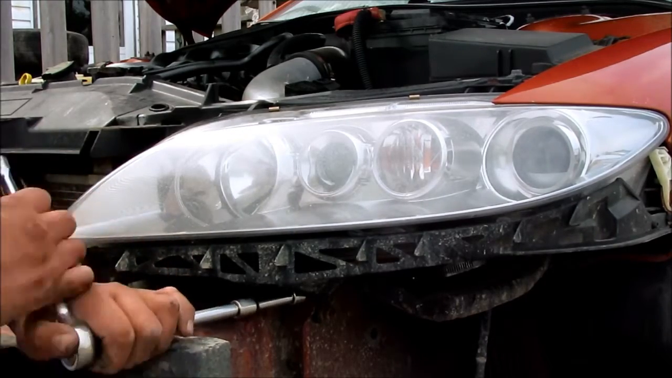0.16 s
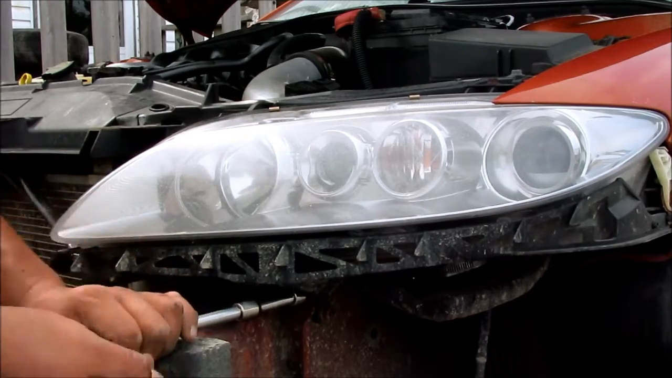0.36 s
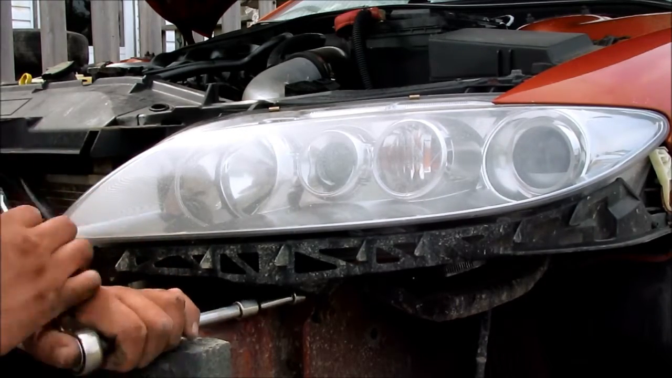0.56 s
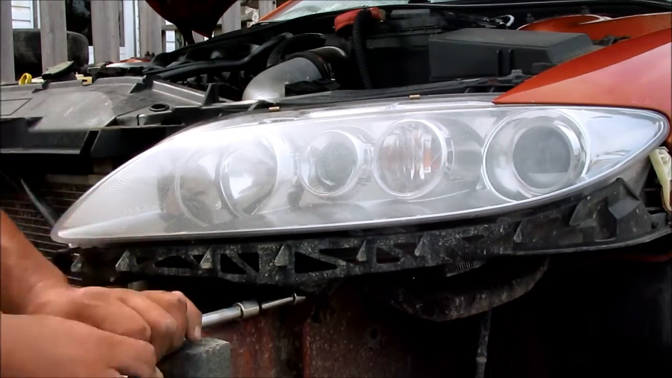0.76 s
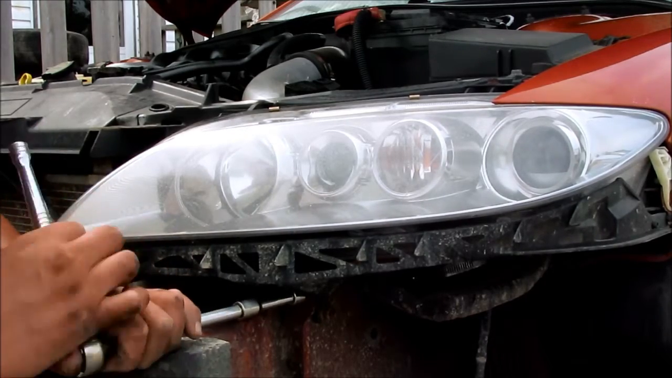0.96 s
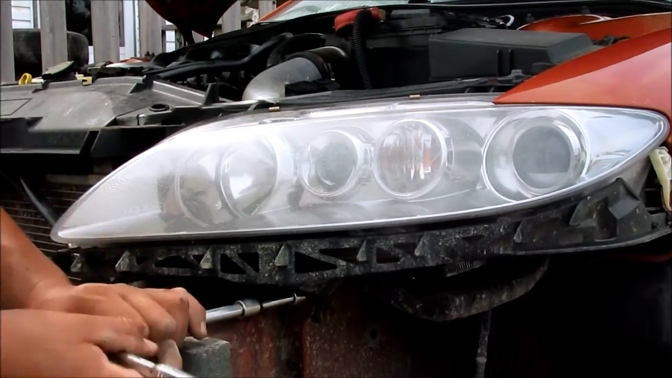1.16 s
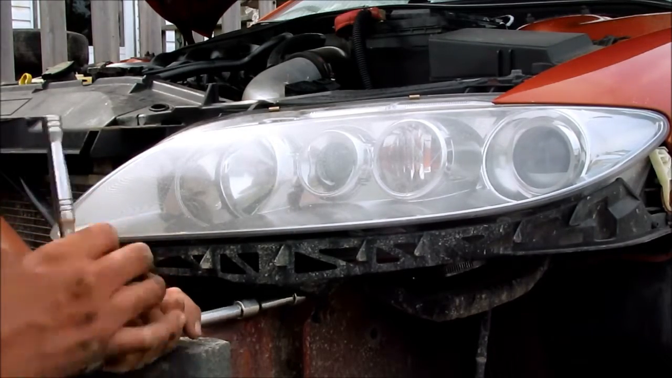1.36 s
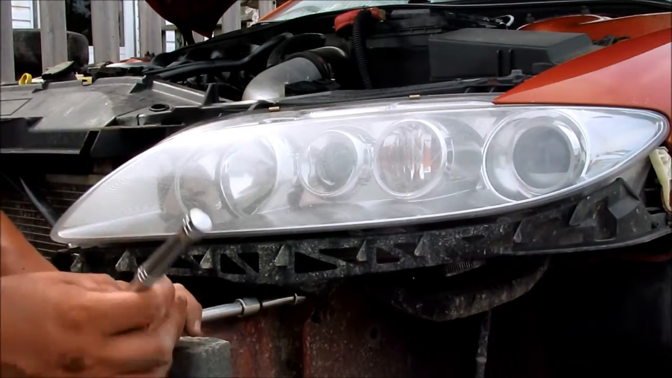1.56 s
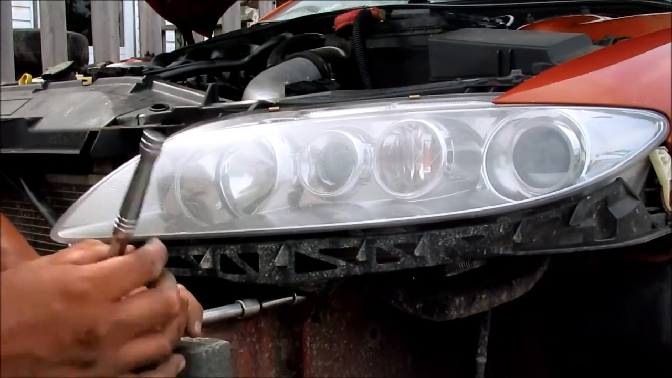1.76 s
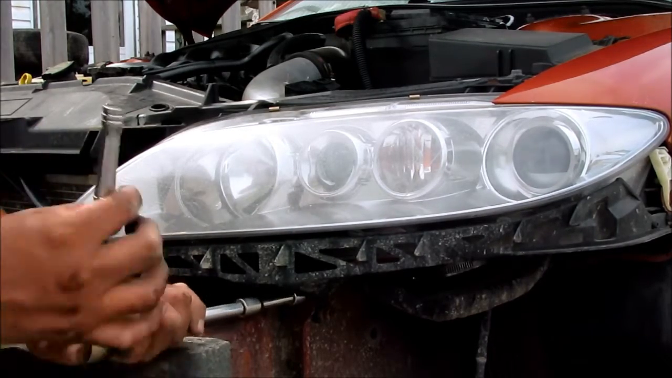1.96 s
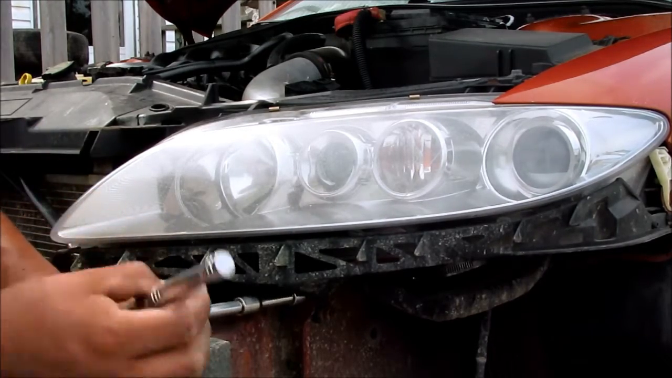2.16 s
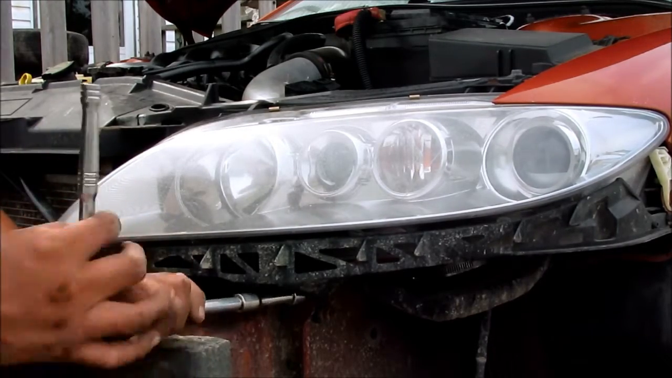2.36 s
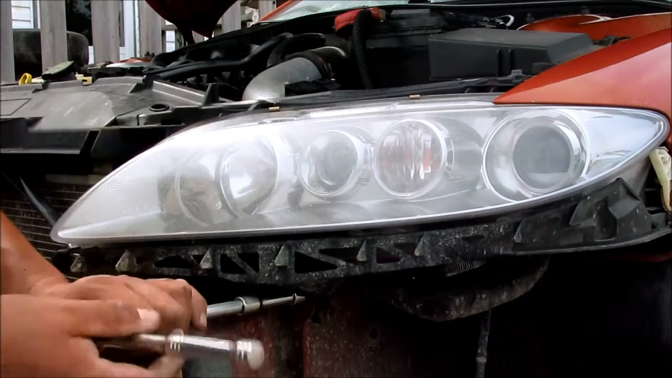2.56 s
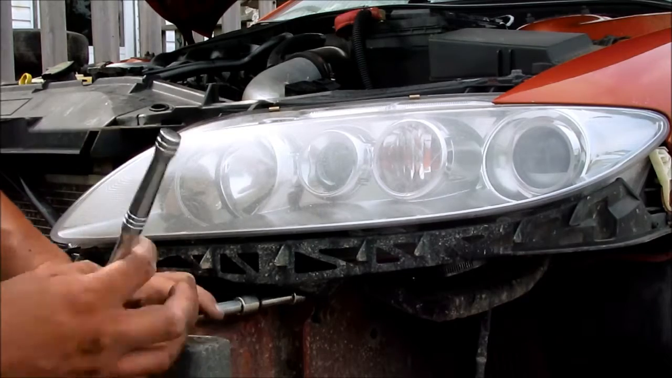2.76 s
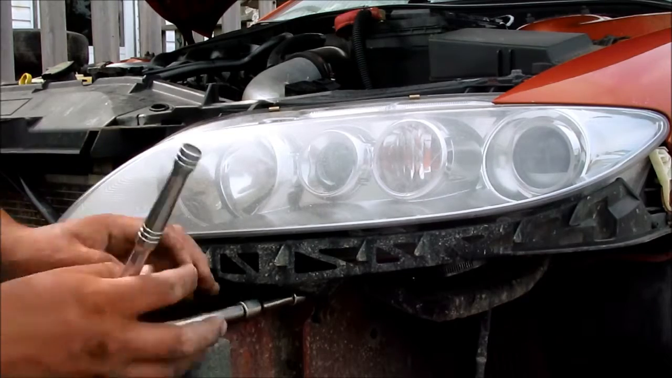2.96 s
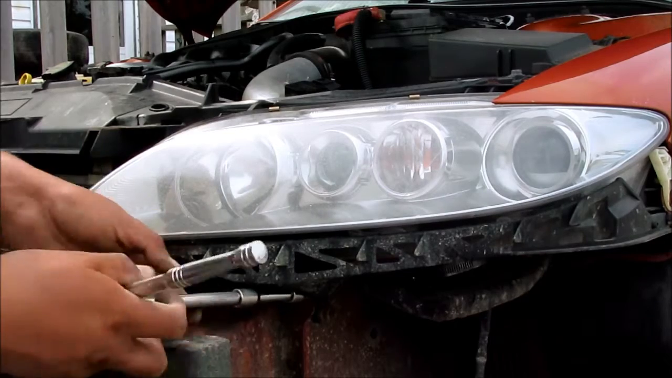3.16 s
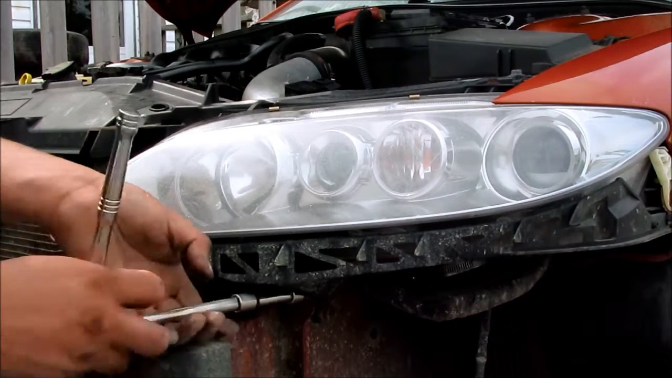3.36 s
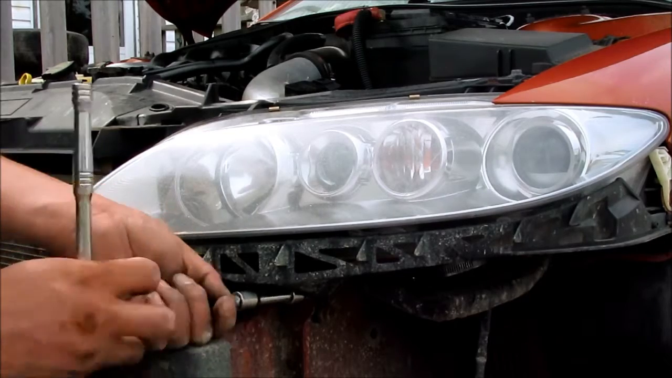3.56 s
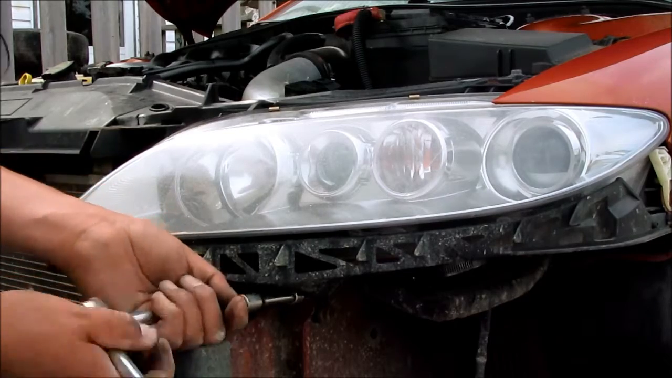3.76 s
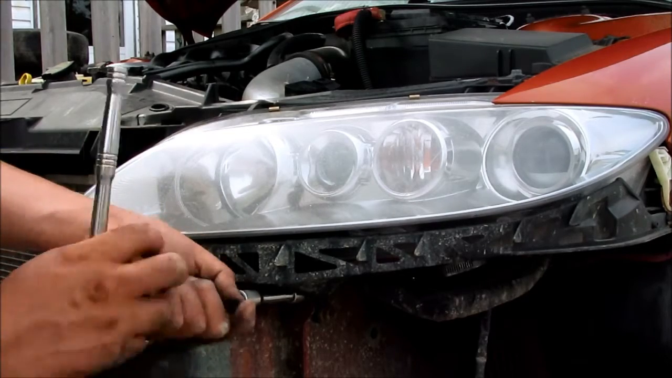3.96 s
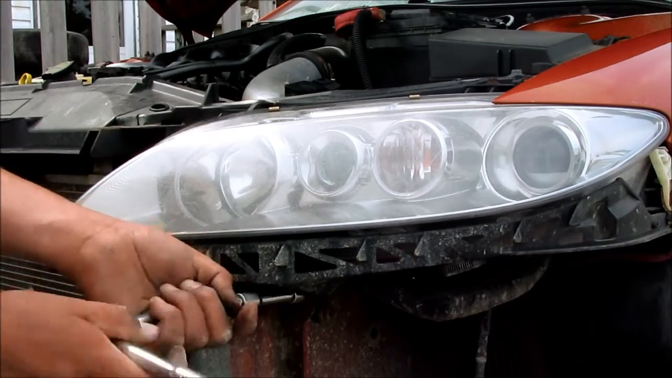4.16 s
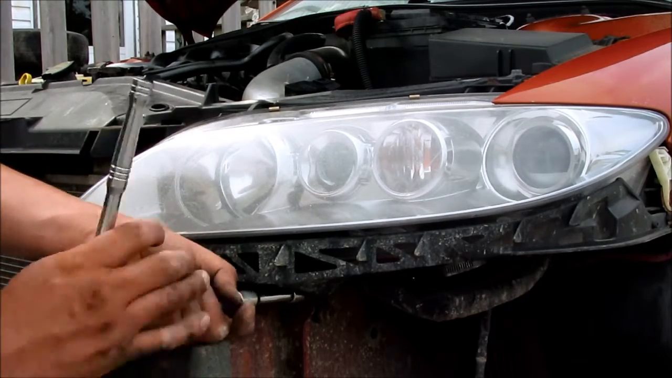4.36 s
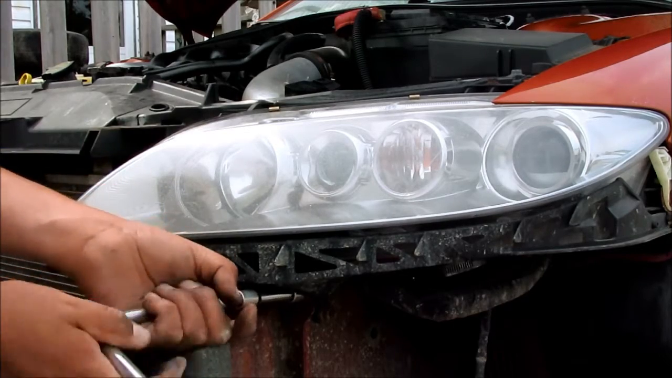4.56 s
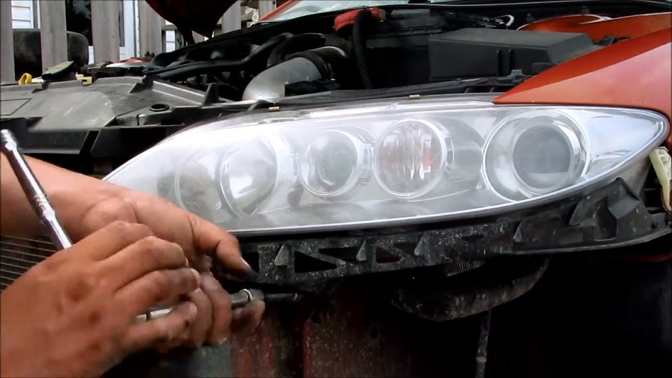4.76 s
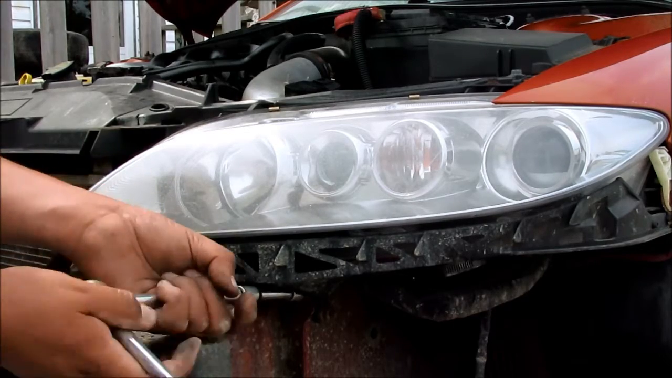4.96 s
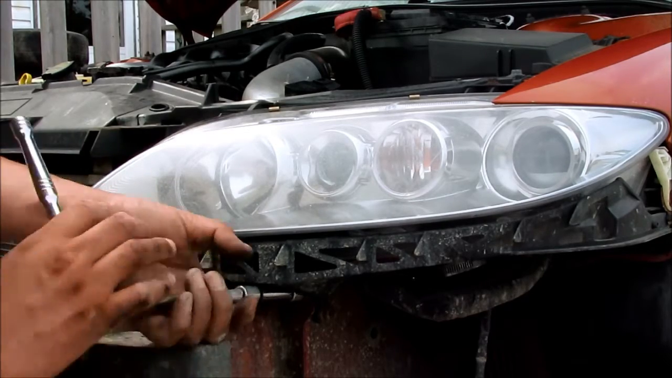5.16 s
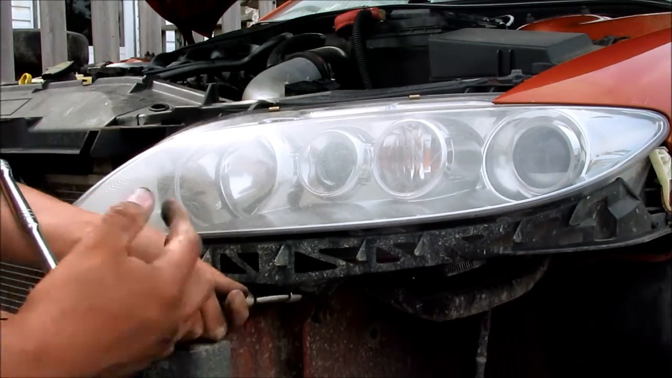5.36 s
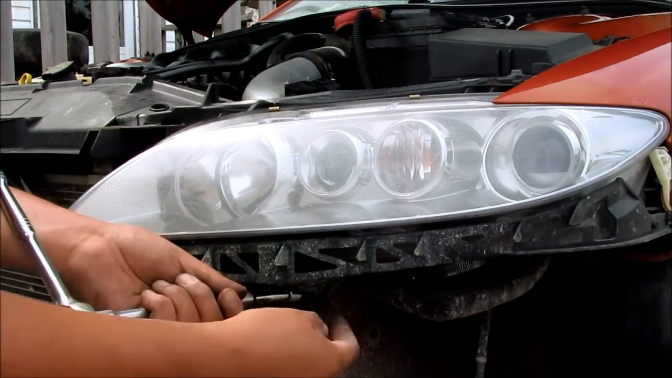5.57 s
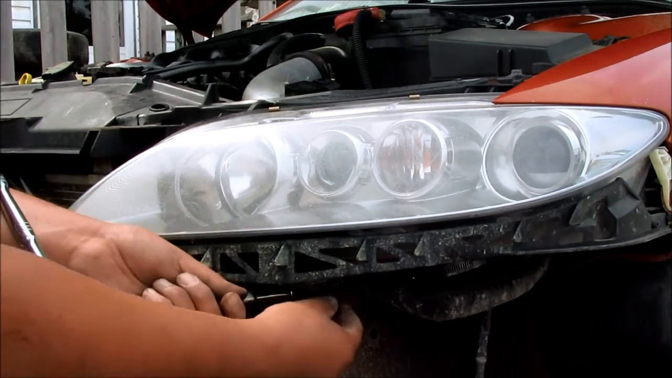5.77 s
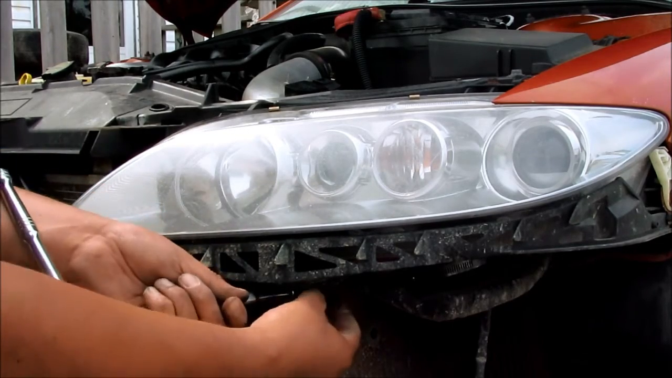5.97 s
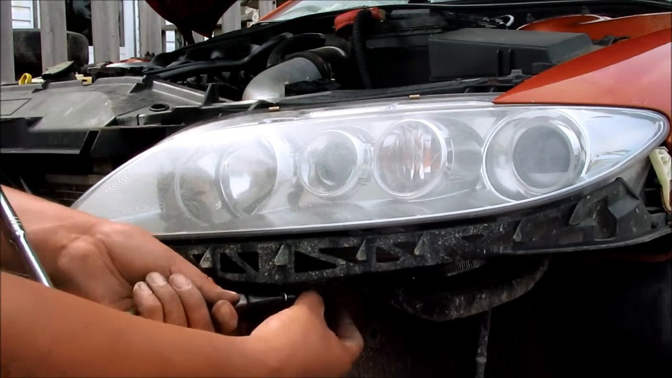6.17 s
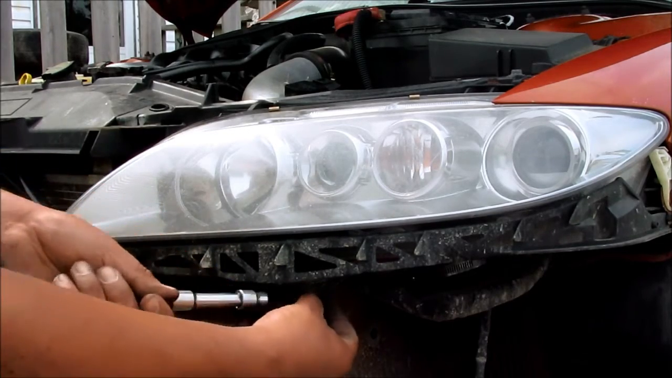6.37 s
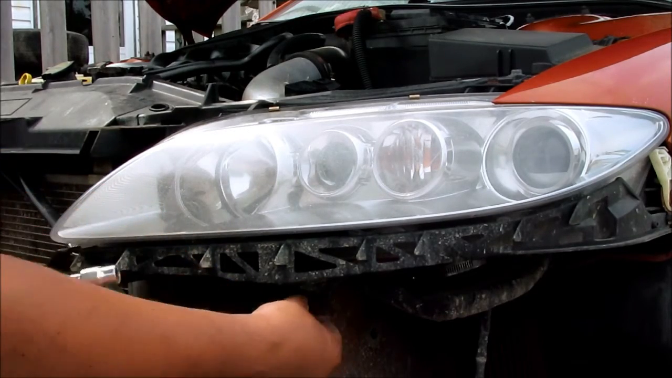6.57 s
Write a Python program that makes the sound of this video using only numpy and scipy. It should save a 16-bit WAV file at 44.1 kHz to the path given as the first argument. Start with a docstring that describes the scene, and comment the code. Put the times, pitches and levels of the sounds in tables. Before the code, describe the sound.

A ratchet wrench clicks in quick repeated bursts on a car bolt outdoors, thinning to metal knocks and rubbing, with light wind on the microphone.

```python
"""Outdoors at a car, a ratchet wrench is swung back and forth on a bolt.
On each return stroke the pawl (a small catch) snaps over the gear teeth, and the steel head and
handle ring. The socket and extension bar knock and rub in the hands, and one blow hits the bodywork.
Gusts of wind buffet the two microphone ports, mostly the right, over a faint outdoor background."""
import sys
import numpy as np
from scipy import signal
from scipy.fft import rfft, irfft, next_fast_len
from scipy.io import wavfile

SR = 44100
rng = np.random.default_rng(int(sys.argv[2]) if len(sys.argv) > 2 else 0)


def store_pcm(level_fs):
    """Save levels as 16-bit WAV."""
    pcm = np.round(np.clip(level_fs, -1, 1) * 32767).astype(np.int16)
    wavfile.write(sys.argv[1], SR, np.atleast_2d(pcm).T)


N = 291060

# Return strokes of the hand. Each row: first and last tooth in seconds, number of teeth, fastest
# point (0 to 1), extra gap between teeth at the start and at the end (in shortest gaps).
STROKES = [(0.0009, 0.0237, 4, .15, 0, .27), (0.2637, 0.3887, 14, .61, .76, .63),
           (0.6391, 0.7722, 16, .67, .49, 1.1), (1.0207, 1.1349, 15, .63, .49, 1.71),
           (1.397, 1.5163, 14, .29, .43, .67), (1.7592, 1.8734, 15, .64, .72, 1.99),
           (2.1316, 2.2517, 14, .59, .6, 1.54), (2.52, 2.6423, 16, .75, .75, 1.14),
           (3.5724, 3.7258, 21, .67, 1.04, .88), (4.0014, 4.1158, 14, .42, .56, 0),
           (4.4071, 4.5294, 15, .8, .81, .71), (4.8001, 4.9719, 23, .36, .37, .27)]
# The extension bar's modes, the tones it rings at.
# Each row: pitch in Hz, relative level in dB, ring time (seconds to fade by 60 dB).
BAR_MODES = [(689.4, -20.5, 0.1), (1167, -16.5, 0.14), (1550, -12, 0.0055), (1974, -15.5, 0.012),
             (2615, -17.5, 0.019), (2920, -18, 0.02285)]


def amp(db):
    """Turn decibels into a gain."""
    return 10 ** (np.asarray(db) / 20)


def rms_one(x):
    """Scale a signal to an average strength (rms) of 1."""
    return x / np.sqrt(np.mean(x ** 2) + 1e-20)


def in_time(rows):
    """Join timed rows with straight lines, giving each column one value per sample."""
    times, *columns = np.transpose(rows)
    return [np.interp(np.arange(N) / SR, times, column) for column in columns]


def colour(x, spectrum):
    """Shape the tone of x with a curve of (Hz, dB) points."""
    hz, db = np.transpose(spectrum)
    size = next_fast_len(N)
    log_hz = np.log(np.arange(size // 2 + 1) * SR / size + 1)
    gain = amp(np.interp(log_hz, np.log(hz), db, left=-90))
    return irfft(rfft(x, size) * rms_one(gain), size)[..., :N]


def band(x, low_hz, high_hz):
    """Keep the sound between two frequencies."""
    return signal.sosfilt(signal.butter(2, [low_hz, high_hz], "band", fs=SR, output="sos"), x)


def drift(hz):
    """A smooth random wobble of typical size 1."""
    r = np.exp(-2 * np.pi * hz / SR)
    return rms_one(signal.lfilter([1], [1, -2 * r, r * r], rng.standard_normal(N + SR))[SR:])


def ring(push, hz, ring_s):
    """One mode: every push starts a fading tone."""
    r, w = amp(-60 / (ring_s * SR)), 2 * np.pi * hz / SR
    return signal.lfilter([0, np.sin(w)], [1, -2 * r * np.cos(w), r * r], push + 1e-18)


def train(times, db):
    """A click of the given level at each time."""
    clicks = np.zeros(N)
    np.add.at(clicks, (np.asarray(times) * SR).astype(int), amp(db))
    return clicks


def envelope(clicks, rise_s, fall_s):
    """A loudness curve that swells and dies after each click."""
    a, b = np.exp(-1 / (rise_s * SR)), np.exp(-1 / (fall_s * SR))
    return signal.lfilter([1 - a], np.convolve([1, -a], [1, -b]), clicks + 1e-18)


def widen(pair, side_db):
    """Make stereo from two signals: one both ears share, one that sets them apart."""
    mid, side = pair
    return mid + amp(side_db) * side * [[1], [-1]]


def stereo_noise(spectrum, side_db):
    """Shaped noise, partly unlike in the two channels."""
    return widen(colour(rng.standard_normal((2, N)), spectrum), side_db)


def struck(times, db, modes, scatter_db, detune, rise_s, spread=1, jump=1, bend=0):
    """Each blow stops the old ring and restarts every mode at a slightly different pitch and level."""
    memory = .75  # share of the pitch offset kept from blow to blow
    luck = rng.standard_normal((len(times), len(modes), 4))
    wander = signal.lfilter([np.sqrt(1 - memory ** 2)], [1, -memory], luck[:, :, 1], axis=0)
    offset = detune * wander + np.reshape(bend, (-1, 1))
    last = np.clip(np.searchsorted(times * SR, np.arange(N)) - 1, 0, None)  # latest blow at each sample
    age = np.clip(np.arange(N) / SR - times[last], 0, None)
    out = 0
    for k, (hz, mode_db, ring_s) in enumerate(modes):
        blow_db = db + mode_db + scatter_db * luck[:, k, 0]
        gain = amp(blow_db[last] - 60 * age / ring_s) * (1 - np.exp(-age / rise_s))
        cycles = np.cumsum(hz * (1 + offset[last, k])) / SR + jump * luck[last, k, 2]
        # Modes radiate unevenly, so left and right are about `spread` radians out of step.
        skew = spread * luck[last, k, 3] * [[.5], [-.5]]
        out = out + gain * np.sin(2 * np.pi * cycles + skew)
    return out


def outdoor_air():
    """The faint, steady rush of the open air."""
    # Its tone. Each row: frequency in Hz, relative level in dB.
    spectrum = [(59, -29), (100, 6), (481, -1), (950, -19), (1150, -4.5), (4200, -10), (10900, -35),
                (13800, -11.5), (16000, -56)]
    return amp(-59) * stereo_noise(spectrum, side_db=0)


def wind():
    """Gusts rumble in each microphone port, brighter when stronger; small swirls slap the right one."""
    # Wind strength. Each row: time in seconds, relative level in dB, left minus right in dB.
    gusts = [(0.0, -43, -4.5), (0.86, -39.5, -1.5), (1.61, -46, -4), (1.8, -43, -3), (1.95, -38,-6),
             (2.15, -35.5, 1), (2.26, -31, -12), (2.59, -43, 7.5), (2.9, -41.5, -9), (3.33, -48.5, 2),
             (3.48, -43, -13.5), (3.66, -49.5, -6), (4.35, -40.5, -3.5), (4.39, -42, 0), (4.96, -45.5, -5),
             (5.43, -36.5, -22.5), (5.73, -45.5, -1.5), (6.42, -31.5, -22), (6.44, -41, -9),
             (6.59, -46, -8)]
    # Single swirls of air. Each row: time in seconds, relative level in dB.
    slaps = [(0.899, -32), (2.805, -29), (2.875, -36), (2.904, -33), (3.42, -28.5), (3.444, -38),
             (3.521, -29), (4.32, -29), (5.266, -22.5), (5.301, -21), (5.325, -24), (5.4, -23),
             (5.429, -27.5), (5.533, -27), (5.641, -28), (5.802, -30.5), (5.923, -22), (6.117, -24),
             (6.205, -30), (6.255, -28), (6.282, -33), (6.339, -19.5), (6.371, -24), (6.401, -20.5),
             (6.417, -22)]
    out = np.zeros((2, N))
    both_db, lean_db = in_time(gusts)
    for port, level_db in enumerate([both_db + lean_db / 2, both_db - lean_db / 2]):
        gust = amp(level_db - 1.5 + 3.2 * drift(16.7) + 2.2 * drift(4))
        low, high = rng.standard_normal((2, N))
        out[port] = gust * rms_one(band(low, 28.8, 126.6))
        out[port] += gust ** 1.39 * amp(5) * rms_one(band(high, 100, 272))
    times, slap_db = np.transpose(slaps)
    pushes = envelope(train(times, slap_db + 18.5), rise_s=0.0011, fall_s=0.0024)
    return out - band(pushes, 69.7, 460) * amp([[-18], [0]])


def socket():
    """The loose socket and bar rub and knock in the hands, and the gritty noise rings the bar."""
    # Loose parts knocking. Each row: time in seconds, dull level in dB, bright part in dB above that.
    knocks = [(0.053, -32.5, -2), (0.156, -45, 9), (0.166, -52, 8), (0.188, -61, 11), (0.415, -36.5, 7.5),
              (0.525, -63, 22), (0.555, -56.5, 17.5), (0.613, -27, -6), (0.627, -34, 9), (0.997, -35.5, 3),
              (1.195, -39.5, 6), (1.2855, -41, -14), (1.3, -26, 0), (1.369, -38, 5), (1.551, -38, 0),
              (1.689, -35, 0), (1.744, -39, 3), (2.112, -37.5, 2.5), (2.299, -37.5, 8),
              (2.482, -55.5, 15.5), (2.689, -39.5, 7.5), (2.832, -50, 22), (3.12, -37, -3),
              (3.139, -40.5, 5), (3.344, -32.5, 2), (3.4785, -58, 5), (3.572, -34.5, 14), (3.764, -33.5, 0),
              (3.97, -34, 6), (4.153, -50, 13), (4.172, -40.5, 7), (4.649, -43, 5), (4.714, -19, -15.5),
              (4.756, -27, -18), (4.787, -28.5, 1), (5.04, -37.5, 1), (5.098, -39, -4), (5.122, -38, 2),
              (5.181, -30, -12), (5.234, -27.5, -1), (5.264, -43.5, 12), (5.364, -33.5, -6.5),
              (6.053, -13.5, -3)]
    # Hands rubbing the socket. Each row: time in seconds, dull and bright relative levels in dB.
    rubbing = [(0.0, -45.5, -52.5), (0.26, -40, -57), (1.08, -48.5, -66), (1.21, -48.5, -57),
               (2.13, -48, -64), (2.22, -33, -40), (2.37, -45.5, -61), (2.68, -41.5, -50.5),
               (3.1, -48.5, -60.5), (3.65, -43, -56.5), (4.46, -51.5, -56.5), (4.75, -36, -50.5),
               (4.84, -48.5, -63), (5.32, -36.5, -50), (5.53, -52, -69), (6.04, -46.5, -56.5),
               (6.06, -48, -51), (6.18, -48.5, -57.5), (6.35, -53.5, -67.5), (6.59, -46.5, -54)]
    # The tone of the bright parts. Each row: frequency in Hz, relative level in dB.
    bright_spectrum = [(1800, -23), (3200, 2.5), (5000, 4), (8500, 4), (11500, 3), (13500, -11),
                       (15500, -16.5)]
    times, dull_db, bright_db = np.transpose(knocks)
    rub_db, hiss_db = in_time(rubbing)
    slide_bright, slide_dull = skin_slides()
    grit = widen(rng.standard_normal((2, N)), side_db=-11.5)
    knock = grit * envelope(train(times, dull_db - 1.5), rise_s=0.0002, fall_s=0.013)
    rub = grit * (amp(rub_db - 1) + slide_dull) * amp(2.4 * drift(18))
    clean_blows = train(times, dull_db + 7)
    bar = 0
    for hz, db, ring_s in BAR_MODES:
        bar += amp(db) / np.sqrt(ring_s * SR) * ring(5.65 * knock + 2.26 * rub, hz, ring_s)
        bar += amp(db) * ring(clean_blows, hz, min(ring_s, .04))
    dull = band(knock, 1200, 2500) + 1.69 * band(rub, 124, 1590)
    crack = envelope(train(times, dull_db + bright_db), rise_s=0.00023, fall_s=0.0052)
    hiss = (amp(hiss_db + 2.5) + slide_bright) * amp(2.97 * drift(27))
    return bar + dull + (crack + hiss) * stereo_noise(bright_spectrum, side_db=-5)


def teeth():
    """When and how hard the pawl drops over each tooth as the hand speeds up and slows down."""
    # How the steel rings as the wrench turns, one list per stroke. Each row: time in seconds,
    # level in dB, then the handle and the head's lower modes in dB above that level.
    stroke_rings = [
        [(0.003, -23, -8.5, -3), (0.021, -55, -24, -10), (0.028, -30, -21, -14)],
        [(0.267, -18.5, -14, -3), (0.345, -14, -13.5, -0.5), (0.355, -18.5, -0.5, -2), (0.383, -19, -10, -3),
         (0.393, -10.5, -23, -7)],
        [(0.642, -19, -12, -2), (0.702, -16, -13, -0.5), (0.722, -21.5, -14, -9), (0.754, -20.5, 1.5, -21),
         (0.776, -28.5, -2.5, -13)],
        [(1.024, -26, -7, 5), (1.042, -7, -15, -20), (1.064, -30.5, 3.5, -18), (1.11, -34, -17, -7),
         (1.139, -16.5, -15, -11)],
        [(1.4, -19, -15, -1), (1.426, -14, -10.5, -2), (1.444, -23, 0, -9), (1.468, -15.5, -15.5, -2),
         (1.52, -31, -7.5, -12)],
        [(1.762, -18, -26, 3), (1.786, -20.5, -11, 5), (1.798, -24.5, -16, 2), (1.862, -24, -12, -37),
         (1.877, -34, -9, -10)],
        [(2.135, -20, -10, -2.5), (2.153, -15.5, -7.5, -6), (2.173, -30.5, -6, -7), (2.239, -13, -25, 4),
         (2.256, -60, -12, -17)],
        [(2.523, -14.5, -15, -1.5), (2.527, -27.5, -6, 8.5), (2.609, -19, -20, 0.5), (2.623, -12, -10.5, -10),
         (2.646, -24, -18, -16)],
        [(3.59, -18, -13, -2.5), (3.636, -12.5, -4, -10), (3.704, -24.5, -18, -4), (3.73, -16, -22, -0.5)],
        [(4.018, -16.5, -14, -1), (4.05, -13.5, -17, -1.5), (4.08, -19.5, -7.5, -9), (4.112, -18, -15, 5.5),
         (4.12, -17, -4, -0.5)],
        [(4.41, -16.5, -22, -2.5), (4.428, -18.5, -19, 0), (4.48, -18.5, -22, -4), (4.502, -24.5, 4.5, -23),
         (4.533, -17, -10, -16)],
        [(4.803, -15, -8.5, -10), (4.835, -26, -16, -9), (4.847, -25.5, 5.5, -28), (4.891, -21, -19, 11),
         (4.976, -22.5, -10.5, -13)],
    ]
    # Single teeth outside the strokes, with the same columns.
    lone_teeth = [(2.936, -16.5, -29, -1), (3.324, -17.5, -12.5, -12), (5.3076, -15.5, -8.5, -3.5),
                  (5.4443, -19.5, -7.5, -3.5)]
    # Teeth that drop harder or softer than their neighbours. Each row: time in seconds, change in dB.
    odd_teeth = [(0.692, 6.5), (1.0385, -2.5), (1.419, 4), (1.489, 3.5), (1.8361, 13), (1.8554, 9.5),
                 (4.106, 3.5), (4.1153, 2.5), (4.8942, -5)]
    jitter_s, scatter_db = 0.000312, 0.5  # no two teeth are alike
    rows = [np.array(lone_teeth)]
    for (first_s, last_s, count, fastest, early, late), curve in zip(STROKES, stroke_rings):
        progress = np.linspace(0, 1, count - 1)
        starting = np.clip(1 - progress / fastest, 0, 1)
        stopping = np.clip((progress - fastest) / (1 - fastest), 0, 1)
        gaps = 1 + early * starting ** 3 + late * stopping ** 3
        luck = rng.standard_normal((count, 2))
        times = first_s + (last_s - first_s) * np.cumsum([0, *gaps]) / gaps.sum() + jitter_s * luck[:, 0]
        at_s, *columns = np.transpose(curve)
        db, handle_db, lower_db = (np.interp(times + .003, at_s, c) for c in columns)  # just after the drop
        rows.append(np.c_[np.abs(times), db + scatter_db * luck[:, 1], handle_db, lower_db])
    rows = np.vstack(rows)
    for at_s, change_db in odd_teeth:
        nearest = np.argmin(np.abs(rows[:, 0] - at_s))
        rows[nearest, :2] = at_s, rows[nearest, 1] + change_db
    return rows[np.argsort(rows[:, 0])].T


def pitch_climb(times):
    """The head's lower modes rise in pitch, by up to 9 percent, late in each stroke."""
    begin, rise, out = .45, .09, 0  # share of the stroke, share of the pitch
    for first_s, last_s, *_ in STROKES:
        progress = (times - first_s) / (last_s - first_s)
        out += rise * np.clip((progress - begin) / (1 - begin), 0, 1) * (times < last_s - .01)
    return out


def pawl():
    """The pawl drops over each tooth with a tick and a snap; the head, handle and pawl all ring."""
    # Modes of the steel parts. Each row: pitch in Hz, relative level in dB, ring time in seconds.
    top_head = [(15550, -14.5, .02), (15300, -14, .02)]
    upper_head = [(11120, 3.5, 0.024), (12000, -4.5, 0.017)]
    lower_head = [(8830, -5.5, 0.0089), (9876, 0, 0.027)]
    handle_modes = [(6928, 3.5, 0.045)]
    pawl_modes = [(1522, -27.5, 0.011), (3330, -26, 0.015), (6010, -18, 0.0095)]
    # The tone of the snap and tick. Each row: frequency in Hz, relative level in dB.
    snap_spectrum = [(900, -20), (2500, -7), (4900, -3.5), (6400, 2), (8700, -2.5), (11500, 9),
                     (13300, -13.5), (15800, 2.5)]
    times, db, handle_db, lower_db = teeth()
    energy_left = np.clip(1 - amp(2 * lower_db) - amp(2 * handle_db), .1, 1)  # the modes share the energy
    even_db = .3 * db  # snap and pawl vary less than the ring
    upper = struck(times, db + 10 * np.log10(energy_left) + 7.5, upper_head,
                   scatter_db=1, detune=.013, rise_s=.00084, jump=.57)
    top = struck(times, db + 6, top_head, scatter_db=4, detune=.006, rise_s=.0005, spread=2.9)
    lower = struck(times, db + lower_db + 6.5, lower_head,
                   scatter_db=2, detune=.015, rise_s=.0007, bend=pitch_climb(times))
    handle = struck(times, db + handle_db + 4, handle_modes,
                    scatter_db=4.5, detune=.0033, rise_s=.00031, jump=.17)
    catch = struck(times, even_db, pawl_modes, scatter_db=5, detune=.11, rise_s=.0003)
    steel = upper + lower + (handle + top) * amp([[-1.2], [1.2]]) + catch + handle_swells()
    snap = envelope(train(times, even_db - 15), rise_s=0.0036, fall_s=0.0064)
    tick = envelope(train(times, even_db - 17.5), rise_s=0.0001, fall_s=0.00026)
    return steel + (snap + tick) * stereo_noise(snap_spectrum, side_db=-11.5)


def bar_taps():
    """The loose bar taps softly; muffled by the hand, only its two lowest modes ring."""
    # Each row is a tap: time in seconds, second mode's level in dB, lowest mode's offset in dB.
    taps = [(0.068, -32.5, -14), (4.6639, -42.5, 7), (4.7235, -27, -14), (4.9107, -36.5, -2),
            (5.0766, -33, -15), (5.1267, -32.5, -20), (5.1548, -35, -18), (5.1968, -29.5, -5.5),
            (5.2381, -35, -3), (5.2596, -26.5, -21), (5.3063, -32, -11), (5.3623, -35, -7),
            (6.0165, -39, -2.5)]
    times, second_db, offset_db = np.transpose(taps)
    signs = rng.choice([-1, 1], N)
    out = 0
    for db, (hz, _, ring_s) in zip([second_db + offset_db + 3.5, second_db], BAR_MODES):
        out += ring(signs * train(times, db), hz, 0.66 * ring_s)
    return band(out, 270, 2300)


def skin_slides():
    """Bright and dull loudness curves of skin sliding along the tool and fading."""
    # Each row is a slide: start and length in seconds, bright and dull levels in dB, total fade in dB.
    slides = [(0.135, 0.056, -47, -64, 7), (0.418, 0.049, -39, -39, 5), (0.767, 0.072, -47, -39, 5),
              (1.497, 0.25, -44.5, -51, 20), (1.302, 0.033, -35, -43, 11), (3.326, 0.046, -46, -43, 9),
              (3.368, 0.23, -50.5, -76, 9), (4.131, 0.097, -46.5, -70, 15), (5.657, 0.106, -48, -43, 10),
              (6.227, 0.085, -58, -45, -4.5)]
    edge_s = 0.014
    t, out = np.arange(N) / SR, 0
    for start_s, length_s, bright_db, dull_db, fade_db in slides:
        age = t - start_s
        edges = np.clip(age / edge_s, 0, 1) * np.clip((length_s - age) / edge_s, 0, 1)
        out += edges * amp([[bright_db], [dull_db]] - fade_db * np.clip(age / length_s, 0, 1))
    return out


def handle_swells():
    """When the grip loosens, the rattling pawl makes the handle's low mode swell briefly."""
    # Each row is a swell: time of its peak in seconds, level in dB.
    swells = [(0.315, -30.5), (0.66, -22), (0.739, -34.5), (1.036, -34), (1.487, -30.5), (1.77, -31.5),
              (2.597, -39), (2.641, -37.5), (3.632, -35), (4.023, -36), (4.442, -38), (4.953, -32.5)]
    half_length_s = .013
    t = np.arange(N) / SR
    shape = sum(amp(db) * np.exp(-((t - peak_s) / half_length_s) ** 2) for peak_s, db in swells)
    rough_tone = rms_one(ring(rng.standard_normal((2, N)), hz=3690, ring_s=.025))
    return shape * widen(rough_tone, side_db=-8)


def bodywork_thump():
    """A rattling blow bends a panel; the high waves arrive first, so the pitch falls."""
    start_s, fall_s = 2.2205, 0.0098
    age = np.clip(np.arange(N) / SR - start_s, 0, None)
    hz = (130 + 900 * np.exp(-age / 0.0064)) * (1 + 0.1289 * drift(167.7))
    tone = np.sin(2 * np.pi * np.cumsum(hz) / SR)
    rattle = 0.86 * rms_one(band(rng.standard_normal(N), 136, 770))
    return amp(-19.5) * (age > 0) * np.exp(-age / fall_s) * (tone + rattle)


def scene():
    """The wrench sits a little right of centre, with air and wind around it."""
    wrench = pawl() + socket() + bar_taps() + bodywork_thump() * amp([[-3], [3]])
    return wrench * amp([[-.3], [.3]]) + outdoor_air() + wind()


def record(dry):
    """Round off the loudest peaks and cut the highest treble steeply."""
    ceiling, stop_hz = .95, 16480
    rounded = ceiling * np.tanh(dry / ceiling)
    return signal.sosfilt(signal.cheby2(12, 60, stop_hz, fs=SR, output="sos"), rounded)


dry = scene()
out = record(dry)
store_pcm(out)
```